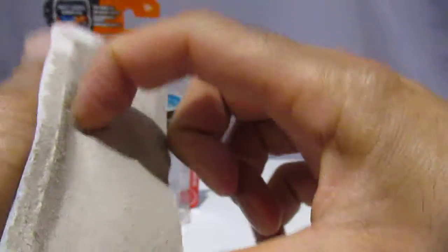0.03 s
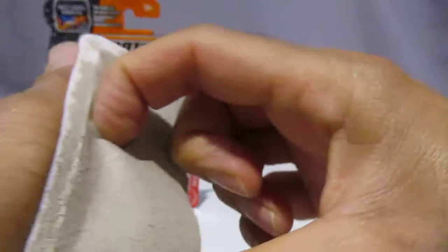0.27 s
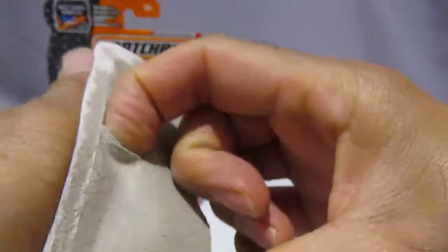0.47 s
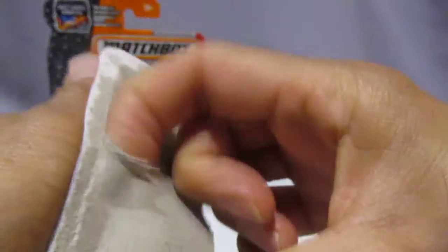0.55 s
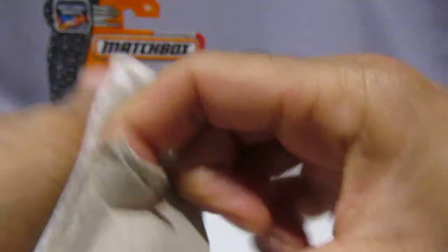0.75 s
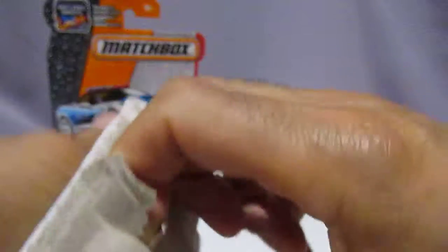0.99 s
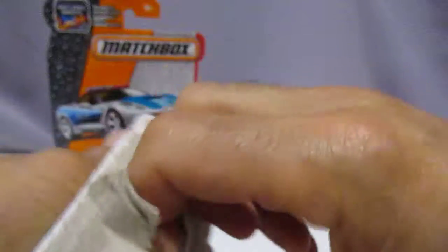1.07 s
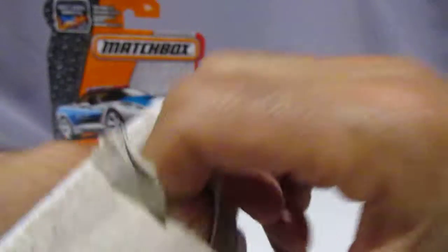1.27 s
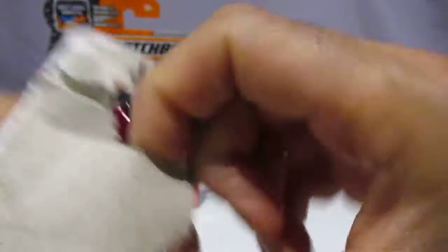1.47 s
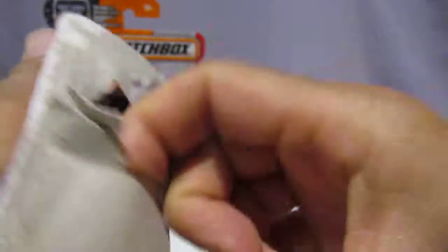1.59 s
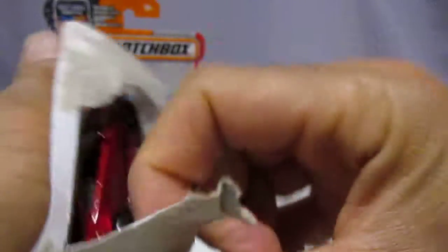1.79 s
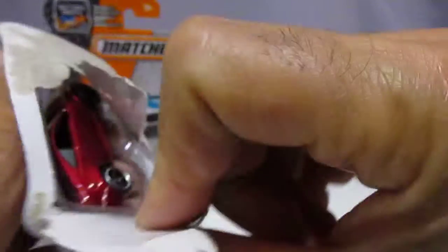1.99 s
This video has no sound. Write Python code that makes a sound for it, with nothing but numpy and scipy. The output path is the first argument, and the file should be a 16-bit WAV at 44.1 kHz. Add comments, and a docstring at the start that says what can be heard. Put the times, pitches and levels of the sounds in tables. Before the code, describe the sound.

Tearing cardboard on a small plastic blister pack, heard very close in a quiet, dry room. Small clicks and fibrous crackle begin at once, with bright plastic ticks near 0.4 s and a hard snap with a thump around 0.59 s. Sparser clicks, renewed rips at 0.83 and 1.1 s, fingernail creaks near 1.2 s, more tearing from 1.33 s, the loudest cracks at 1.75-1.79 s, then faint crackles fading out.

```python
"""A quiet room: fingers tear open the card back of a small blister pack, close to two microphone ports.
Paper fibres part in a dense crackle, made of random clicks shaped by the card's tones and a bright fizz.
The card rips in short bursts of crackle and snaps with fading notes; the stiff plastic ticks and pings.
Soft thumps are low swelling notes, a fingernail creaks in rows of small rings, and soft noise is the air."""
import sys
import numpy as np
from scipy import signal
from scipy.fft import rfft, irfft, next_fast_len
from scipy.io import wavfile
from scipy.ndimage import uniform_filter1d, map_coordinates

SR = 44100
rng = np.random.default_rng(int(sys.argv[2]) if len(sys.argv) > 2 else 0)


def dump(signal):
    """Clip the signal to [-1, 1] and save it as 16-bit WAV at the path in sys.argv[1]."""
    limited = np.clip(np.atleast_2d(signal).T, -1, 1)
    pcm = np.round(limited * 32767).astype(np.int16)
    wavfile.write(sys.argv[1], SR, pcm)


def voltage_ratio(level):
    """Linear amplitude factor for a level in decibels (scalar or array-like)."""
    return 10 ** (np.asarray(level, float) / 20)


N = 90404

# steady peeling of the paper, before flutter and a small trim: (time [s], card's low tones [dB],
# card's upper tones [dB], fibre fizz [dB], finest fizz [dB])
PEELING = [(0, -42.5, -50.5, -52.5, -59.5), (0.085, -48.5, -42.5, -55.5, -50.5),
           (0.095, -47, -50.5, -58, -60), (0.17, -48.5, -53, -60, -62), (0.187, -34.5, -44, -43, -48),
           (0.24, -41.5, -40.5, -41, -42), (0.3, -47.5, -38, -36.5, -37.5),
           (0.35, -50, -39.5, -35.5, -41.5), (0.4, -47, -44, -36, -36), (0.435, -52.5, -45, -38.5, -36.5),
           (0.46, -45, -50.5, -46, -50), (0.5, -41, -46.5, -48, -50), (0.545, -45, -42, -44, -41.5),
           (0.603, -41, -42, -42.5, -48), (0.645, -51, -48, -44.5, -43), (0.655, -60, -60, -53.5, -53),
           (0.72, -52, -54, -65, -58), (0.74, -43, -54, -68, -67), (0.755, -49, -48.5, -51, -52),
           (0.802, -41.5, -40.5, -42, -41), (0.85, -40.5, -35, -42.5, -50), (0.89, -46, -38, -41, -42.5),
           (0.95, -42.5, -45, -41.5, -45), (1.0, -44, -51.5, -50, -51), (1.02, -40.5, -47, -48.5, -50),
           (1.08, -40.5, -42, -39, -43.5), (1.11, -37, -46.5, -44, -52), (1.17, -40.5, -46, -42.5, -43),
           (1.191, -48, -51.5, -53, -58), (1.28, -44.5, -44, -49, -54), (1.33, -39.5, -35.5, -39.5, -40),
           (1.367, -36.5, -32, -33.5, -38), (1.4, -47, -45, -48, -49), (1.42, -46, -48, -58, -61),
           (1.465, -46, -48.5, -50, -52), (1.488, -41.5, -39, -39, -37), (1.558, -33.5, -38, -38.5, -43),
           (1.578, -34.5, -42, -42, -46.5), (1.64, -35.5, -40.5, -45, -49.5),
           (1.665, -42.5, -36.5, -37.5, -37.5), (1.73, -38, -39, -32.5, -37), (1.771, -32, -37, -40, -34.5),
           (1.8, -51, -38, -41, -54), (1.83, -53, -57, -50, -52), (1.875, -59.5, -62, -55, -58),
           (1.9, -51, -51.5, -43.5, -45), (1.93, -52, -49.5, -44, -40.5), (1.96, -56.5, -57.5, -52.5, -51),
           (2.0, -54, -51, -62, -61), (2.05, -50, -61, -64.0, -69)]
# the card flexes with a dull thump: (middle [s], level [dB], half-length of the swell [s], pitch [Hz])
CARD_THUMPS = [(0.086, -58.5, 0.049, 110), (0.162, -42, 0.0069, 490), (0.242, -48.5, 0.024, 340),
               (0.367, -52, .012, 252), (.592, -33, 0.009, 115), (.83, -49.5, 0.0067, 206),
               (1.098, -48, 0.015, 71), (1.6, -50.5, 0.012, 171), (1.75, -37, 0.0039, 332),
               (1.783, -31, 0.0057, 155), (1.793, -49.5, 0.021, 66)]
# short rips: (start [s], length [s], body level [dB], fizz level [dB], body pitch [Hz], fizz pitch [Hz])
SHORT_RIPS = [(0.155, 0.0096, -40, -52, 1850, 6000), (0.1753, 0.0137, -38.5, -55, 490, 9000),
              (0.333, 0.022, -41, -36, 3100, 13500), (1.763, 0.013, -32.5, -34, 3380, 10100),
              (1.593, 0.012, -33.5, -48, 3270, 6000), (0.065, 0.016, -43, -48.5, 1940, 8700),
              (0.375, 0.012, -30.5, -45, 1260, 9000), (0.397, 0.0032, -32, -37, 1390, 9200),
              (0.407, 0.027, -41.5, -35.5, 3080, 6700), (0.5393, 0.0025, -32, -22, 1880, 9600),
              (0.557, 0.0067, -29.5, -27.5, 1770, 9600), (.565, 0.0075, -24.5, -21.5, 1960, 9800),
              (0.574, 0.013, -33.5, -31.5, 1020, 8900), (0.584, 0.0072, -22, -24, 1100, 9800),
              (0.59, 0.0073, -17, -20, 3540, 12400), (.824, 0.0094, -33, -30.5, 2500, 13000),
              (0.835, 0.0064, -30.5, -42, 2670, 8000), (0.868, 0.01, -32, -42, 2070, 5540),
              (1.088, 0.01, -19, -21, 1180, 9760), (1.338, 0.01, -30, -44, 980, 8200),
              (1.544, 0.013, -27, -52, 1150, 9000), (1.598, .007, -34.5, -43, 3470, 5950),
              (1.671, 0.01, -37, -29.5, 1290, 5500), (1.7494, 0.0082, -29.5, -48, 950, 9000),
              (1.7464, 0.0032, -24.5, -29, 1270, 7400), (1.779, 0.0081, -20, -20, 3980, 10200),
              (1.787, 0.0064, -35, -33, 1260, 8900), (1.94, .012, -42.5, -37.5, 1360, 9100)]
# single snaps and clicks, before the boosts below: (time [s], knock level [dB], tick level [dB],
# knock pitch [Hz], tick pitch [Hz])
SINGLE_SNAPS = [(0.1036, -28.5, -51, 1940, 5000), (0.1124, -34, -42.5, 3360, 8350),
                (0.127, -32, -42, 3380, 8400), (0.1375, -34.5, -42.5, 3320, 8300),
                (0.1597, -23, -48, 1880, 5000), (0.1819, -27, -40, 560, 12000),
                (0.2384, -23.5, -55, 850, 11900), (0.2438, -30.5, -46, 960, 12900),
                (0.3707, -25, -33, 580, 11000), (0.3975, -42, -48, 1010, 9300),
                (0.4549, -35.5, -40, 635, 11500), (0.471, -35, -40.5, 2100, 6740),
                (0.504, -52, -40, 1510, 9700), (0.5416, -33, -40, 1200, 9000),
                (0.5848, -12, -25, 860, 10000), (0.6874, -32.5, -47, 3640, 8600),
                (0.6933, -35.5, -54, 1360, 9500), (0.7026, -31.5, -51, 3180, 7100),
                (0.7087, -37, -63, 880, 8000), (0.7158, -34, -54, 1200, 7500),
                (0.7473, -37.5, -43, 940, 13600), (0.8085, -35, -34.5, 3600, 10000),
                (0.813, -35, -39, 3650, 13500), (0.8202, -36, -39, 3570, 9000),
                (0.83, -35, -36, 2500, 7540), (0.8278, -22, -44, 3600, 7400),
                (0.8355, -27, -47, 1010, 8000), (0.8403, -19.5, -40, 2550, 5000),
                (0.8686, -21.5, -30, 1000, 6300), (0.8724, -26, -36, 1170, 5850),
                (1.01, -34.5, -44, 2700, 5000), (1.116, -36, -38, 1040, 9600),
                (1.137, -35, -37, 1340, 9700), (1.151, -39, -34.5, 1250, 10000),
                (1.1613, -37, -37, 3320, 9750), (1.192, -33.5, -46, 1750, 12200),
                (1.2006, -33.5, -53, 1440, 9000), (1.2053, -52, -43, 4050, 11200),
                (1.214, -33, -46, 1680, 9000), (1.242, -30.5, -55, 1200, 8200),
                (1.2747, -34, -41.5, 940, 9200), (1.3138, -30, -38, 1070, 9700),
                (1.3357, -20.5, -29, 1660, 7600), (1.3651, -24.5, -29, 1590, 9100),
                (1.3992, -30, -50, 3750, 12000), (1.409, -35, -49, 1180, 6500),
                (1.414, -34, -54, 1350, 5000), (1.4234, -31.5, -59, 1350, 5600),
                (1.4805, -34, -55, 3480, 12700), (1.5196, -23, -34, 1050, 10700),
                (1.5487, -30, -50, 1090, 9000), (1.598, -22.5, -39, 1310, 6000),
                (1.6482, -40, -48, 3030, 9500), (1.6724, -28, -36, 1300, 10500),
                (1.7046, -41, -34, 2310, 6560), (1.709, -42, -37, 1300, 6500),
                (1.7237, -27, -31.5, 2010, 7040), (1.7194, -32, -34, 1350, 6450),
                (1.73, -23, -32, 1320, 6400), (1.7469, -11.5, -18, 1950, 7640),
                (1.757, -48, -37, 1080, 5030), (1.7604, -23, -25.5, 1350, 11400),
                (1.7767, -17, -35, 1560, 9000), (1.7806, -11, -24, 1410, 8700),
                (1.7853, -16.5, -33, 1900, 10100), (1.8092, -28.5, -37.5, 3650, 9900),
                (1.8687, -54, -48, 3270, 10900), (1.9082, -44, -44, 1490, 5300),
                (1.9467, -27.5, -47, 1270, 8000), (1.9814, -33.5, -40, 1120, 5860)]
# the taut plastic pings on one high note: (middle [s], level [dB], half-length of the swell [s], pitch [Hz])
PLASTIC_PINGS = [(0.361, -18, .0008, 15000), (.3659, -15, 0.0014, 13900), (.3948, -25, 0.0017, 9600),
                 (1.68, -19.5, 0.00065, 9700)]
# a fingernail creaks along the card, slip by slip: (time [s], level [dB])
NAIL_SLIPS = [(1.1765, -47), (1.183, -39), (1.2073, -33.5), (1.22, -28), (1.2305, -38), (1.2354, -34),
              (1.248, -38), (1.2552, -31), (1.261, -42), (1.265, -32), (1.271, -56), (1.283, -35)]
# the two card tones that each slip rings: (pitch [Hz], level [dB], time to fade by 60 dB [s])
SLIP_TONES = [(1300, -1, .006), (3400, -8, .004)]

# Colours of noise and crackle; only their shape counts, as the loudness is set elsewhere.
# the whole card, in rips and snaps: (frequency [Hz], level [dB])
CARD_COLOUR = [(120, -37), (200, -18.5), (474, -7.5), (527, -5.5), (834, 1), (1280, -4), (1660, -4),
               (3720, -7), (5000, -13.5), (6500, -56), (11000, -120)]
# the card's low tones while peeling: (frequency [Hz], level [dB])
CARD_LOW_COLOUR = [(150, -40.5), (300, -14.5), (480, -12), (800, -2), (1150, -0.5), (1500, -4),
                   (2000, -15.5), (3000, -50)]
# the card's upper tones while peeling: (frequency [Hz], level [dB])
CARD_HIGH_COLOUR = [(1000, -30), (1500, -16.5), (2000, 0.5), (2600, -1), (3400, -1), (4200, -10),
                    (5500, -37)]
# fizz of the paper fibres: (frequency [Hz], level [dB])
FIBRE_COLOUR = [(2500, -22), (3500, -4.5), (4500, -2.5), (6000, -1.5), (8000, -1.5), (9500, -4),
                (11000, -67)]
# the finest, highest fizz: (frequency [Hz], level [dB])
FINEST_COLOUR = [(7000, -64), (8500, -30), (9700, 5.5), (12000, 4.5), (14000, 1), (15800, -3.5),
                 (17000, -95)]
# low rumble of the moving card: (frequency [Hz], level [dB])
RUMBLE_COLOUR = [(25, -7), (60, -18), (120, -1.5), (250, -2), (400, 0), (700, -60), (1500, -120)]
# air of the quiet room: (frequency [Hz], level [dB])
AIR_COLOUR = [(25, -6), (60, 5), (200, 2.5), (500, -14), (1000, -7.5), (4000, -14), (16000, -18.5)]

# balance of the two ports: (frequency [Hz], left over right [dB])
PORT_TILT = [(300, 1.5), (700, -1.3), (1400, 0.5), (2800, -1), (5600, -0.5), (9000, 5.5), (14000, 5.5)]
# gain of the tearing that is added for one port only: (frequency [Hz], gain [dB])
PORT_SCATTER = [(60, 9), (300, -5.5), (700, -16), (1400, -14), (2800, -11), (5000, -3), (12000, 1.5)]

AIR_DB = -57.5
HANDLING_DB = -27.5  # middle of the rumble's wavering level, under the low tones of the peeling
GRAINS_PER_S, GRAIN_SPREAD_DB = 7000, 2.5  # breaking fibres, and how unequal they are
FLUTTER_DB, FLUTTER_PER_S = 1, 140  # size and pace of the stick and slip
PATCHY_DB = 5  # size of the random, slowly drifting gain patches in the crackle
RIP_RISE_S, RIP_FALL_S = 0.0013, 0.001
RIP_Q, RIP_TONE_DB, FIZZ_Q, FIZZ_TONE_DB = 4, 0, 5, 2  # sharpness and strength of the added ringing
SNAP_T60_S, TICK_T60_S, KNOCK_RISE_S = 0.0091, 0.0097, 0.00028  # T60: time to fade by 60 dB
SNAP_BODY_DB, SNAP_TICK_DB = 4, 10.5  # boosts of every knock and tick
SNAP_ROUGH = 0.53  # noise beside the pure note of a knock
PING_WAVER_RAD = 1.45
LEAD_S = 5e-5  # left is ahead of right by this
ROOM_DB, ROOM_T60_S = -16.5, 0.053
SHIFT_S = 0.05  # the room's random tail is drawn anew this often, which keeps its colour even
TOP_HZ = 16000  # a steep low-pass filter removes nearly everything above this frequency
PEAK_LIMIT = 1.05  # peaks bend towards this, where 1 is full scale


def unit(x):
    """Scale to an average (rms) strength of 1."""
    return x / np.sqrt(np.mean(x ** 2) + 1e-20)


def along(points, hz):
    """Read a value between (frequency, value) points, spacing the frequencies as the ear does."""
    f, v = np.transpose(points)
    return np.interp(np.log(hz + 1), np.log(f + 1), v)


def wobble(rate):
    """A smooth random curve with a new random point rate times a second."""
    return map_coordinates(rng.standard_normal(2000), [np.arange(N) * rate / SR])


def filtered(x, response):
    """Multiply each frequency in x by the response there."""
    n = x.shape[-1]
    m = next_fast_len(n + 8192)  # spare room for the filter's tail
    return irfft(rfft(x, m) * response(np.fft.rfftfreq(m, 1 / SR)), m)[..., :n]


def coloured(x, colour):
    """Give x the loudness by frequency of a colour table, then strength 1."""
    return unit(filtered(x, lambda hz: voltage_ratio(along(colour, hz))))


def ringing(x, hz, q, tone_db):
    """Add to x its own ringing at one pitch, as a stiff sheet would, then scale to strength 1."""
    ring = filtered(x, lambda f: 1j * f * hz / q / (hz * hz - f * f + 1j * f * hz / q))
    return unit(unit(x) + voltage_ratio(tone_db) * unit(ring))


def swell(t, middle, length):
    """A bell-shaped rise and fall of loudness around its middle."""
    return np.exp(-((t - middle) / length) ** 2)


def room_air():
    """Soft steady noise of the quiet room, separate at each port."""
    return voltage_ratio(AIR_DB) * coloured(rng.standard_normal((2, N)), AIR_COLOUR)


def crackle():
    """Fibres break at random moments, as clicks of random strength, a few much louder than the rest."""
    breaks = rng.random(N) < GRAINS_PER_S / SR
    return breaks * rng.standard_normal(N) * voltage_ratio(GRAIN_SPREAD_DB * rng.standard_normal(N))


def patchy(x):
    """Vary the gain at random in bands some 500 Hz wide that last about a tenth of a second."""
    z = signal.stft(x, nperseg=512)[2]
    field = uniform_filter1d(rng.standard_normal(z.shape), size=6, axis=0)  # smooth over frequency
    field = uniform_filter1d(field, size=16, axis=1)  # smooth over time
    return signal.istft(z * voltage_ratio(PATCHY_DB * unit(field)), nperseg=512)[1][:N]


def peel(slip_db):
    """Steady tearing: crackle in the card's tones and the fizz flutters as the tear sticks and slips."""
    times, *levels = np.transpose(PEELING)
    t = np.arange(N) / SR
    gains = [voltage_ratio(np.interp(t, times, db) + slip_db + 1.33 * wobble(120) - 0.5) for db in levels]
    rumble_gain = voltage_ratio(HANDLING_DB + 3.7 * wobble(25.1))
    rumble = rumble_gain * coloured(rng.standard_normal(N), RUMBLE_COLOUR)
    breaks = crackle()
    out = gains[0] * rumble
    colours = (CARD_LOW_COLOUR, CARD_HIGH_COLOUR, FIBRE_COLOUR, FINEST_COLOUR)
    for gain, colour in zip(gains, colours):
        out = out + gain * coloured(patchy(breaks), colour)
    return out


def thumps():
    """Soft low pushes of the flexing card: a low note and rumble under a bell-shaped swell."""
    t = np.arange(N) / SR
    rumble = coloured(rng.standard_normal(N), RUMBLE_COLOUR)
    out = np.zeros(N)
    for middle, db, length, hz in CARD_THUMPS:
        note = np.sin(2 * np.pi * hz * (t - middle))
        out += voltage_ratio(db) * swell(t, middle, length) * (note + 0.67 * rumble)
    return out


def fibres(source):
    """Shape a source into both bands of fibre fizz."""
    return unit(coloured(source, FIBRE_COLOUR) + 0.55 * coloured(source, FINEST_COLOUR))


def rips():
    """Bursts of dense crackle: card and fibres ring at each burst's own pitches."""
    out = np.zeros(N + SR)
    u = np.arange(-600, 2400) / SR  # seconds from the start of a rip
    card, fizz = coloured(crackle(), CARD_COLOUR), fibres(crackle())
    for start, length, body_db, fizz_db, hz, fizz_hz in SHORT_RIPS:
        first = round((start + u[0]) * SR)
        part = slice(first, first + len(u))
        shape = np.exp(np.minimum(u / RIP_RISE_S, 0) + np.minimum((length - u) / RIP_FALL_S, 0))
        body = voltage_ratio(body_db) * ringing(card[part], hz, RIP_Q, RIP_TONE_DB)
        bright = voltage_ratio(fizz_db) * ringing(fizz[part], fizz_hz, FIZZ_Q, FIZZ_TONE_DB)
        out[part] += shape * (body + bright)
    return out[:N]


def snaps():
    """Single snaps: a quickly fading knock of the card and a short bright tick of the plastic."""
    out, t = np.zeros(N + SR), np.arange(1000) / SR
    card = coloured(rng.standard_normal(N + SR), CARD_COLOUR)
    fizz = fibres(rng.standard_normal(N + SR))
    for start, knock_db, tick_db, hz, tick_hz in SINGLE_SNAPS:
        part = slice(round(start * SR), round(start * SR) + len(t))
        knock = np.sin(2 * np.pi * hz * t) + SNAP_ROUGH * card[part]
        knock = knock * voltage_ratio(-60 * t / SNAP_T60_S) * (1 - np.exp(-t / KNOCK_RISE_S))
        tick = ringing(fizz[part], tick_hz, FIZZ_Q, FIZZ_TONE_DB) * voltage_ratio(-60 * t / TICK_T60_S)
        out[part] += voltage_ratio(knock_db + SNAP_BODY_DB) * knock + voltage_ratio(tick_db + SNAP_TICK_DB) * tick
    return filtered(out[:N], lambda hz: hz ** 2 / (hz ** 2 + 350 ** 2))  # thin out the lows


def pings():
    """The taut plastic sounds brief wavering notes under a bell-shaped swell."""
    t, waver = np.arange(N) / SR, PING_WAVER_RAD * wobble(800)
    out = np.zeros(N)
    for middle, db, length, hz in PLASTIC_PINGS:
        out += voltage_ratio(db) * swell(t, middle, length) * np.sin(2 * np.pi * hz * t + waver)
    return out


def creak():
    """Each slip of the fingernail rings two tones of the card, which fade at once."""
    out, t = np.zeros(N), np.arange(400) / SR
    ring = np.zeros(len(t))
    for hz, db, t60 in SLIP_TONES:
        ring -= voltage_ratio(db - 60 * t / t60) * np.sin(2 * np.pi * hz * t)
    for start, db in NAIL_SLIPS:
        out[round(start * SR):][:len(t)] += voltage_ratio(db) * ring
    return out


def room(x):
    """Every short stretch of x gets its own fading noise tail of energy 1, one for each port."""
    step, t = round(SHIFT_S * SR), np.arange(SR // 5) / SR
    out = np.zeros((2, N + step + len(t)))
    for i in range(0, N, step):
        tail = rng.standard_normal((2, len(t))) * voltage_ratio(-60 * t / ROOM_T60_S)
        tail = tail / np.linalg.norm(tail, axis=1, keepdims=True)
        wet = signal.fftconvolve(x[None, i:i + step], tail, axes=1)
        out[:, i:i + wet.shape[1]] += wet
    return out[:, :N]


def ports(x, own):
    """Two ports hear the pack a moment apart, plus tearing from their own end of the tear and the room."""
    side = np.array([[0.5], [-0.5]])  # left, right
    direct = filtered(x, lambda hz: np.exp(2j * np.pi * side * hz * LEAD_S))
    near = filtered(own, lambda hz: voltage_ratio(along(PORT_SCATTER, hz)))
    heard = direct + near + voltage_ratio(ROOM_DB) * room(x)
    return filtered(heard, lambda hz: voltage_ratio(side * along(PORT_TILT, hz)))


def scene():
    """Pack and room air; the tearing is made afresh for both ports together, for left and for right."""
    slip_db = FLUTTER_DB * wobble(FLUTTER_PER_S)  # one stick and slip for all three
    both, left, right = (peel(slip_db) + rips() + snaps() + pings() for _ in range(3))
    pack = ports(both + thumps() + creak(), np.array([left, right]))
    return pack + room_air()


def band_limit(x):
    """A steep low-pass at the top of the band."""
    return signal.sosfilt(signal.butter(12, 16490, fs=SR, output="sos"), x)


def record(dry):
    """A steep filter takes off the very top and the loudest peaks are rounded off near full scale."""
    heard = filtered(dry, lambda hz: 1 / (1 + (hz / TOP_HZ) ** 60))
    mix = heard / (1 + np.abs(heard / PEAK_LIMIT) ** 8) ** (1 / 8)
    return band_limit(mix)


dry = scene()
out = record(dry)
dump(out)
```